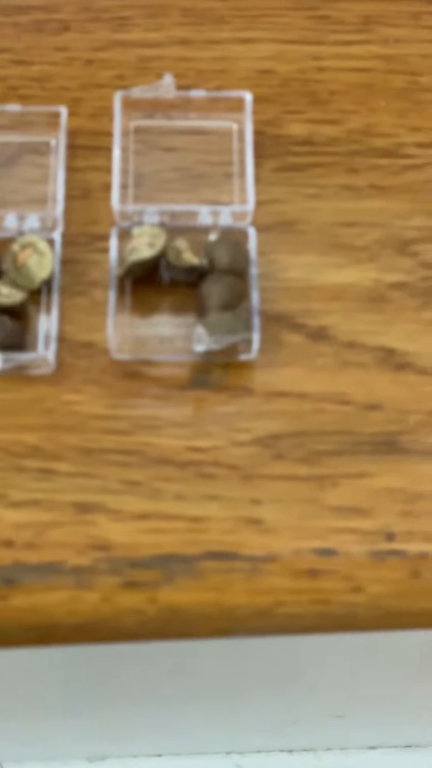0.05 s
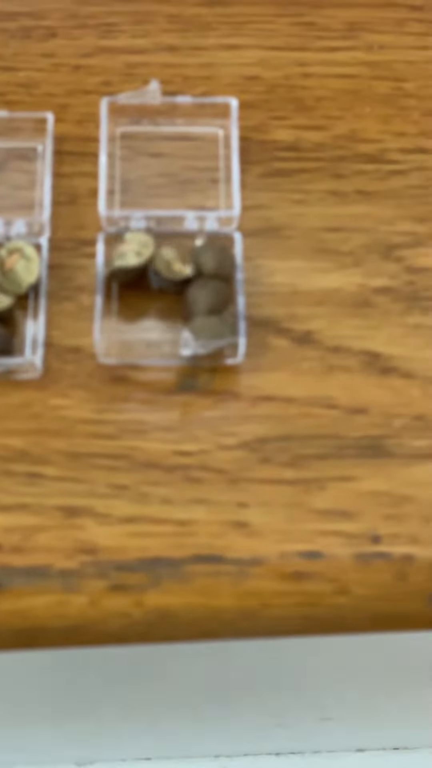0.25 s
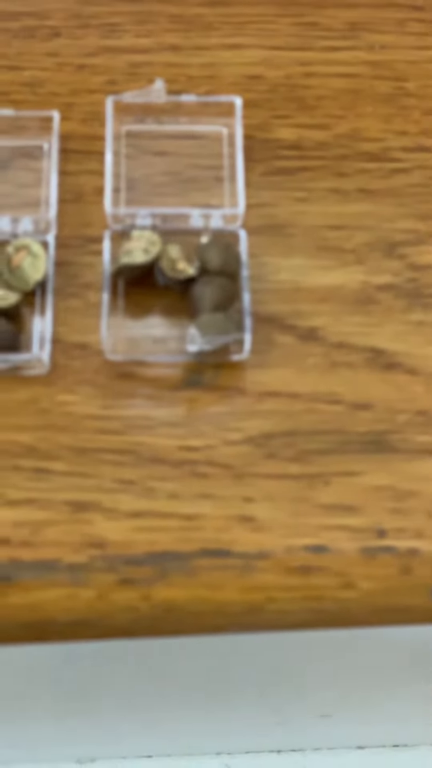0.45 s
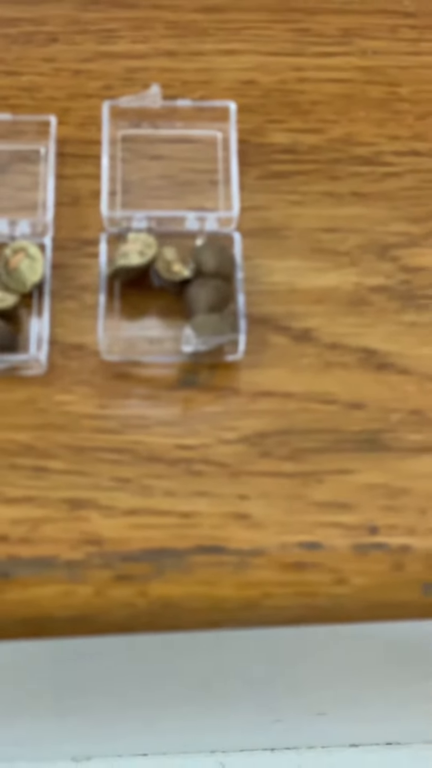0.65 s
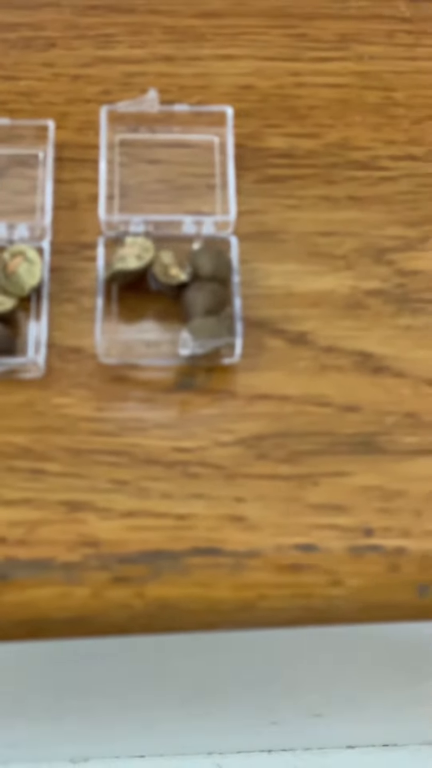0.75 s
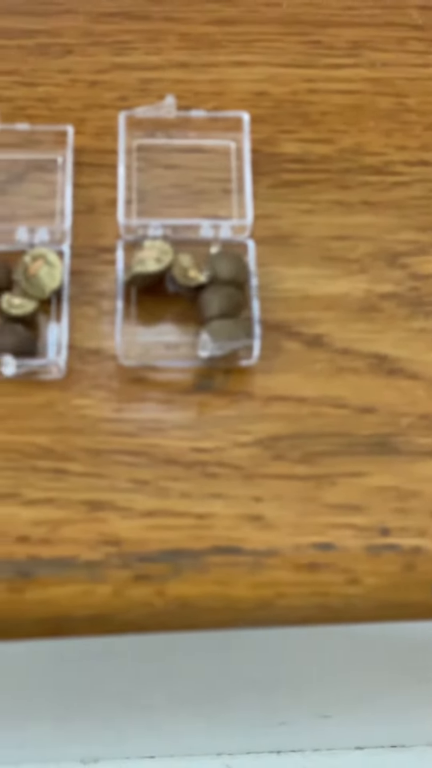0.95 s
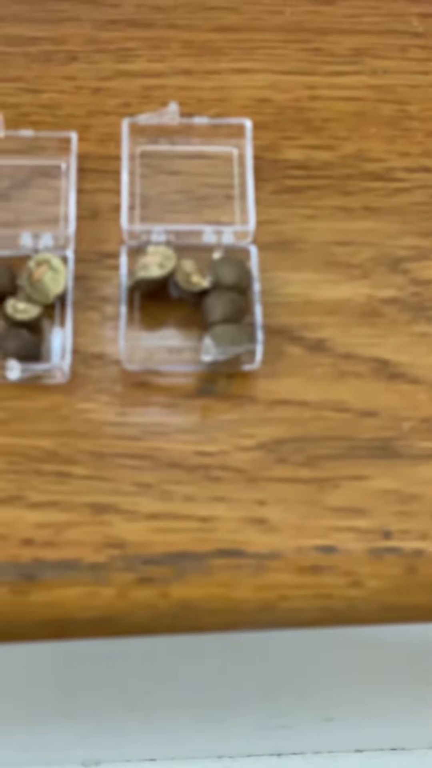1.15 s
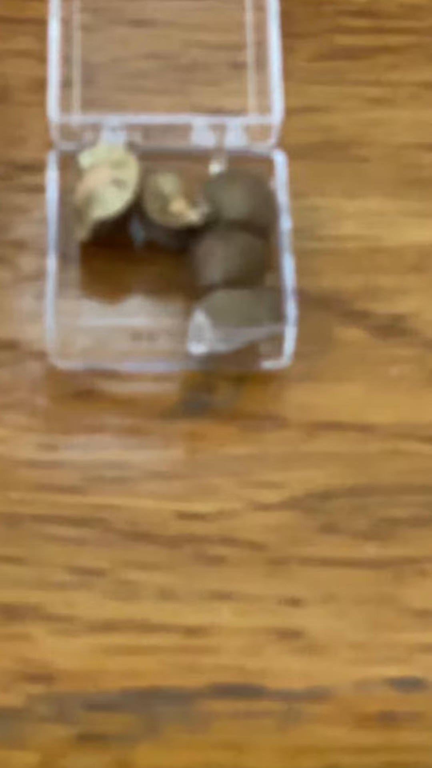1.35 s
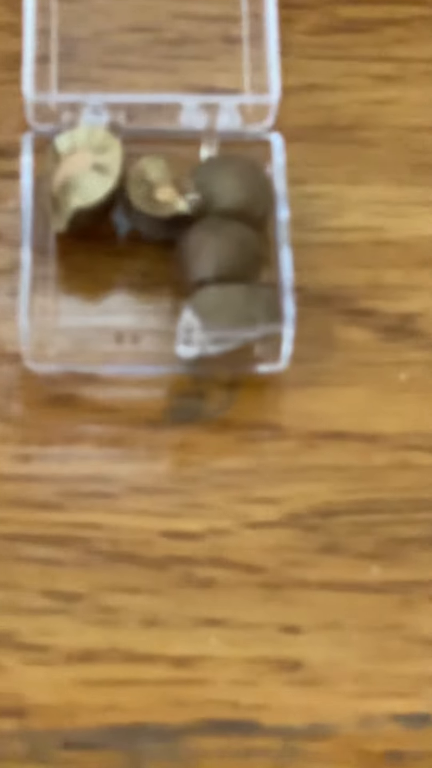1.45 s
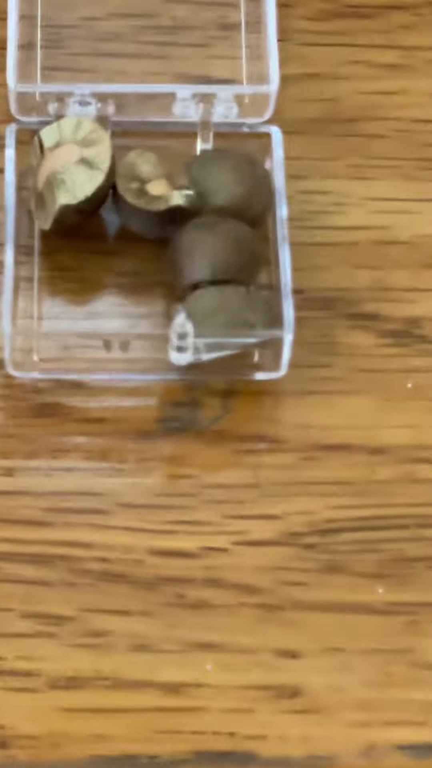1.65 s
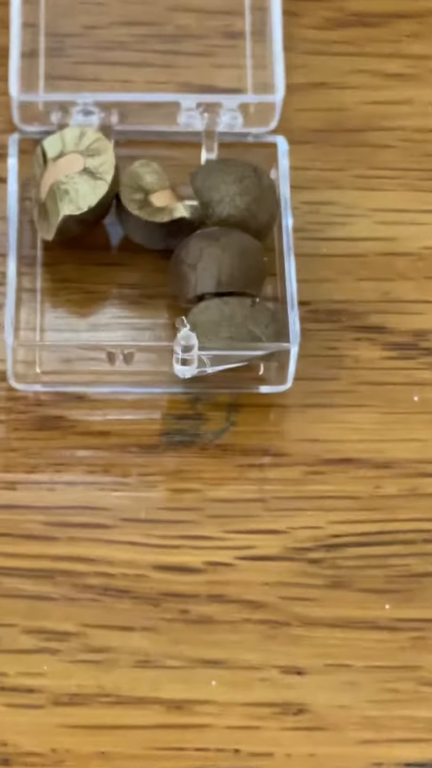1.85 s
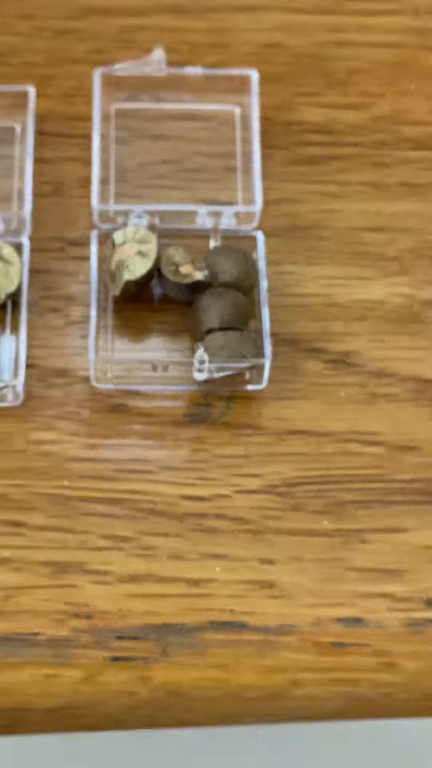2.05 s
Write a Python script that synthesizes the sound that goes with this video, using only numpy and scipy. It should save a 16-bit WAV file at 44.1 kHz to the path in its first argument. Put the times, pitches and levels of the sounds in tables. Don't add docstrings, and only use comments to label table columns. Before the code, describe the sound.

Close, crisp plastic clicks: a loud snap, then a lighter rattle, then another loud snap, each with small bounces on wood. Quiet room with soft rumble, distant taps and muffled thumps from holding the microphone.

```python
import sys
import numpy as np
from scipy import signal
from scipy.fft import rfft, irfft
from scipy.io import wavfile

SR = 44100
rng = np.random.default_rng(int(sys.argv[2]) if len(sys.argv) > 2 else 0)


def inscribe(sig):
    pcm = np.round(np.clip(np.atleast_2d(sig).T, -1, 1) * 32767)
    wavfile.write(sys.argv[1], SR, pcm.astype(np.int16))


def amplitude_ratio(level_db):
    exponent = np.asarray(level_db, float) / 20
    return 10 ** exponent


N = 92610
APART = np.c_[[1, -1]]
TOP_HZ = 15500


def cut(x, hz, kind, order=2):
    return signal.sosfilt(signal.butter(order, hz, kind, fs=SR, output="sos"), x)


def coloured(spectrum):
    hz = np.fft.rfftfreq(N, 1 / SR)
    points_hz, points_db = np.transpose(spectrum)
    gain = amplitude_ratio(np.interp(np.log(hz + 1), np.log(points_hz), points_db))
    noise = irfft(rfft(rng.standard_normal(N)) * gain, N)
    return noise / noise.std()


def ventilation():
    # (frequency [Hz], level [dB])
    rumble = [(28, -24), (40, -1.5), (100, -2.5), (150, -9), (190, -7.5), (300, -19), (480, -31),
              (750, -25.5), (1300, -34), (1900, -50.5), (4000, -87)]
    # (time [s], frequency [Hz], level [dB])
    fan = [
        (0, 178, -58.5),
        (0.549, 178, -70),
        (.8, 178, -58.5),
        (1.2, 178, -60.5),
        (1.65, 178, -60),
        (1.8, 177, -73),
        (2.1, 177, -58),
    ]
    time, hz, db = np.transpose(fan)
    t = np.arange(N) / SR
    phase = 2 * np.pi * np.cumsum(np.interp(t, time, hz)) / SR
    tone = np.sqrt(2) * amplitude_ratio(np.interp(t, time, db)) * np.sin(phase)
    return amplitude_ratio(-54) * coloured(rumble) + tone


def diffuse_air():
    # (frequency [Hz], level [dB])
    air = [(120, -20), (200, -1.5), (900, -5), (1300, -10.5), (2000, -33.5), (4000, -47.5)]
    return amplitude_ratio(-73.5) * coloured(air) * APART


def hiss():
    # (frequency [Hz], density [dB per Hz])
    hiss_colour = [(800, -6), (1500, 2.5), (3000, -7.5), (6000, -10), (9000, -11.5), (13000, -13.5),
                   (15000, -23.5), (16500, -44)]
    common = coloured(hiss_colour)
    unlike = 0.15 * coloured(hiss_colour) * APART
    return amplitude_ratio(-83.5) * (common + unlike)


def sleeve_rustle():
    # (frequency [Hz], density [dB per Hz])
    cloth = [(700, -9.5), (1200, 4), (2500, -6), (5000, -9), (9000, -10.5), (13000, -6.5), (14500, -12),
             (16000, -35.5)]
    # (time [s], level [dB])
    rustle = [
        (0.0, -101),
        (0.24, -100),
        (0.36, -85),
        (0.55, -85),
        (0.67, -98),
        (0.97, -91.5),
        (1.13, -97),
        (1.3, -100),
        (2.1, -100),
    ]
    db = np.interp(np.arange(N) / SR, *np.transpose(rustle)) + 4.5
    return amplitude_ratio(db) * coloured(cloth)


def ring(force, hz, t60):
    radius = amplitude_ratio(-60 / (t60 * SR))
    w = 2 * np.pi * hz / SR
    return signal.lfilter([0, np.sin(w)], [1, -2 * radius * np.cos(w), radius ** 2], force)


def strike(rows, modes, contact, rise, crack_db=-80, damped=0., one_way=False):
    out = np.zeros(N + SR)
    t = np.arange(SR // 4) / SR
    swell = (1 - np.exp(-t / rise)) ** 2 * (1 - damped + damped * np.exp(-t / .001))
    for time, db, *extra in rows:
        force = contact()
        force = np.pad(force, (0, len(t) - len(force)))
        spread = rng.normal(0, 1, (len(modes) + 1, 2))
        tilt, own = 0, []
        if extra:
            tilt, own_db, own_hz = extra
            own = [(own_hz, own_db, .01)]
        hit = np.zeros(len(t))
        for k, (hz, mode_db, t60) in enumerate([*modes, *own]):
            deviation, side = spread[k]
            mode_db = mode_db + 3 * deviation
            if k < len(modes):
                mode_db += tilt * np.log2(hz / 2000)
            sign = (-1) ** k if one_way else np.sign(side)
            hit += sign * amplitude_ratio(mode_db) * ring(force, hz, t60)
        crack = amplitude_ratio(crack_db) * rng.standard_normal(len(t)) * np.exp(-t / 0.0003)
        hit = swell * (hit + crack)
        opening_rms = hit[:int(0.0028 * SR)].std()
        start = int(time * SR)
        out[start:start + len(t)] += amplitude_ratio(db) * hit / (2.465 * opening_rms)
    return out[:N]


def smeared_contact():
    return rng.standard_normal(1200) * np.exp(-np.arange(1200) / SR / .0045)


def far_taps():
    # (time [s], level [dB], tilt [dB per octave], ring level [dB], ring frequency [Hz])
    taps = [
        (.1875, -50.5, -2, -9, 3930),
        (.6468, -48.5, -4., -6.5, 1840),
        (.7627, -60.5, -5, 0, 5230),
        (.828, -57.5, -4, 0, 1330),
        (1.8835, -52, -3, -1.5, 1687),
        (2.0283, -72, 5, 7.5, 4100),
    ]
    # (frequency [Hz], level [dB], decay time T60 [s])
    body = [(1209, -2.5, .006), (2300, -1, 0.0034), (3070, -8, 0.0018), (4200, -5, .003),
            (5700, -7, 0.0016), (7230, -2, 0.0018), (9000, -3, 0.0034), (11800, 0.5, .003),
            (14970, -2, .002)]
    return cut(strike(taps, body, smeared_contact, 0.0017), TOP_HZ, "low", order=6)


def hard_contact():
    t = np.arange(600) / SR
    chatter = rng.standard_normal(600) ** 3 / 4 * np.exp(-t / .003)
    return (t == 0) + amplitude_ratio(-24) * chatter


def hard_strike(rows, modes):
    return strike(rows, modes, hard_contact, .00035, crack_db=-11.5, damped=.6)


def lid_snaps():
    # (time [s], peak level [dB])
    snaps = [
        (.2205, -40),
        (.2225, -36),
        (.2286, -12),
        (.2358, -29),
        (1.1805, -34.5),
        (1.1868, -11),
        (1.1977, -22.5),
    ]
    # (frequency [Hz], level [dB], decay time T60 [s])
    lid = [(2967, -20.5, 0.0076), (4185, -19, 0.036), (5300, -13.5, .012), (6100, -0.5, 0.0086),
           (6110, -6, 0.0065), (7770, -11.5, 0.041), (8760, -13.5, 0.02), (9150, -13, 0.023),
           (10935, 0.5, .018), (9980, -4, 0.0043), (11540, -12, .008), (12800, -12, 0.0053),
           (13580, -19, 0.0059), (14500, -34.5, 0.0087)]
    return hard_strike(snaps, lid)


def corner_landings():
    # (time [s], peak level [dB])
    landings = [(.2437, -19), (.2597, -29), (.8641, -29.5), (.8745, -45.5), (.9005, -43.5), (.9172, -24.5),
                (.934, -40), (.9435, -47), (.9669, -39), (1.2060, -18), (1.2185, -39.5)]
    # (frequency [Hz], level [dB], decay time T60 [s])
    corner = [(3220, -23, .012), (4514, -15.5, 0.016), (5570, -9, 0.0075), (6000, 6, 0.0032),
              (6390, -4, 0.0093), (7690, -10, .02), (8460, -8, 0.012), (9560, -6, 0.0088),
              (10700, -16, .014), (13820, -22, 0.004), (12660, -19, .01)]
    return hard_strike(landings, corner)


def wall_hits():
    # (time [s], peak level [dB])
    blows = [
        (.8515, -19),
        (.8878, -19),
    ]
    # (frequency [Hz], level [dB], decay time T60 [s])
    wall = [(2500, -27, 0.038), (3530, -22.5, .015), (4430, -8, 0.013), (5610, -10.5, 0.0142),
            (5690, -4.5, 0.0056), (6510, -10.5, 0.017), (7870, -3, 0.018), (9320, 1.5, .018),
            (10856, -2, 0.0092), (11140, -10, .012), (12910, -4.5, 0.012), (14700, -19.5, 0.0096)]
    return hard_strike(blows, wall)


def fingertip():
    return cut(np.r_[1., np.zeros(300)], 1070, "low")


def finger_knocks():
    # (time [s], peak level [dB])
    knocks = [(1.0578, -33), (1.0593, -37.5), (1.0623, -35), (1.0650, -25.5), (1.0815, -43.5),
              (1.101, -46.5), (1.369, -43), (1.506, -40.5), (1.609, -47.5), (1.779, -45.5), (1.877, -47),
              (1.948, -44), (1.983, -38), (2.017, -51), (2.052, -56)]
    # (frequency [Hz], level [dB], decay time T60 [s])
    housing = [(165.6, -14.5, 0.02), (349, -5.5, 0.016), (540, -4.5, 0.017), (685, -2.5, 0.026),
               (1075, -16.5, 0.012), (55, -25, 0.16)]
    return strike(knocks, housing, fingertip, 0.00033, one_way=True)


def room(x):
    t = np.arange(SR) / SR
    white = rng.standard_normal((2, SR))
    low = cut(white, 8170, "low")
    decay = low * amplitude_ratio(-60 * t / 0.45) + (white - low) * amplitude_ratio(-60 * t / .3)
    common, own = decay * (t > 0.002)
    tail = (common + 0.073 * own * APART) / np.sqrt(np.sum(common ** 2))
    return signal.fftconvolve(x[None], tail, axes=1)[:, :N]


def scene():
    near = lid_snaps() + corner_landings() + wall_hits()
    near = cut(cut(near, 2450, "high"), TOP_HZ, "low", order=6)
    panned = near + (amplitude_ratio(2 * APART) - 1) * cut(near, 2995, "low", order=4)
    far = far_taps()
    knocks = finger_knocks()
    wet = room(amplitude_ratio(-19.5) * near + amplitude_ratio(-2.5) * far)
    background = hiss() + sleeve_rustle() + ventilation() + diffuse_air()
    return panned + far * amplitude_ratio(1 * APART) + wet + knocks + background


def port_phase(x):
    # (frequency [Hz], phase [rad])
    ports = [(3900, 0.), (4400, 0.83), (4780, 1.94), (5040, 0.5), (5900, 0.6), (7000, 1.28), (9000, 3),
             (10200, 3.5), (11500, 3.5), (12700, 5), (13900, 2 * np.pi)]
    lead = np.interp(np.fft.rfftfreq(N, 1 / SR), *np.transpose(ports))
    return irfft(rfft(x) * np.exp(0.5j * lead * APART), N)


def band_limit(x):
    return signal.sosfilt(signal.butter(12, 16790, fs=SR, output="sos"), x)


def record(dry):
    mix = port_phase(dry)
    return band_limit(mix)


dry = scene()
out = record(dry)
inscribe(out)
```